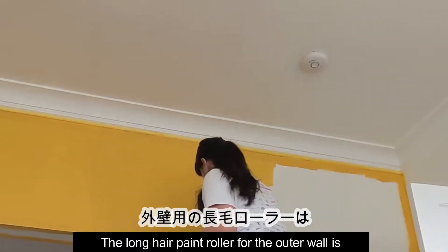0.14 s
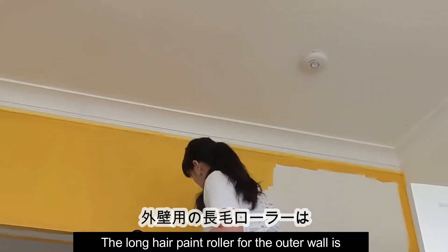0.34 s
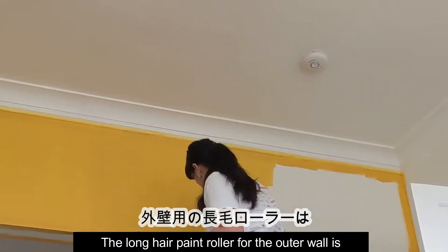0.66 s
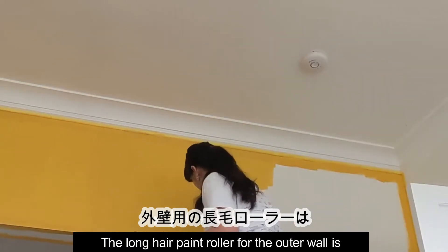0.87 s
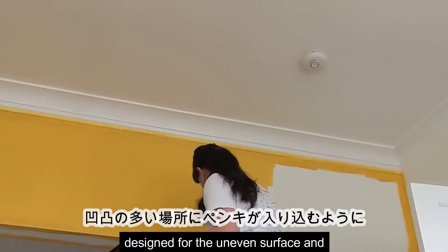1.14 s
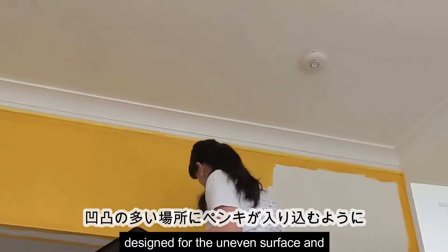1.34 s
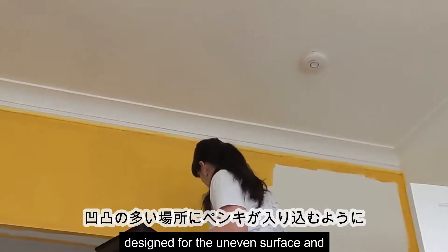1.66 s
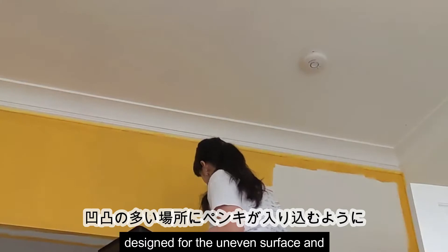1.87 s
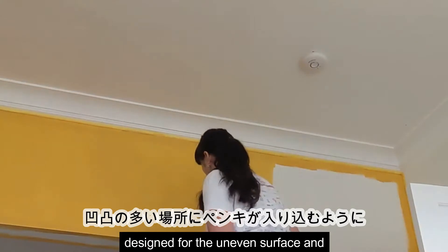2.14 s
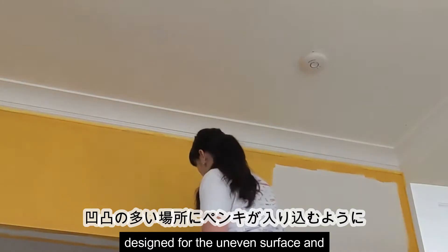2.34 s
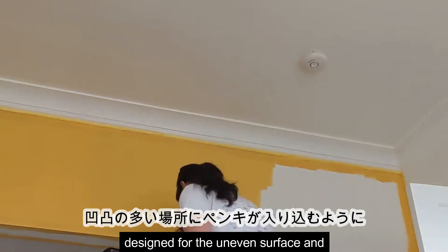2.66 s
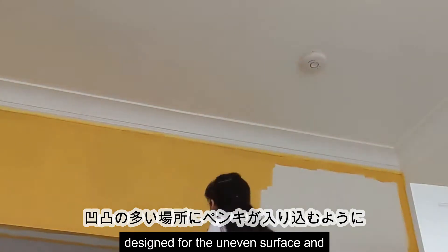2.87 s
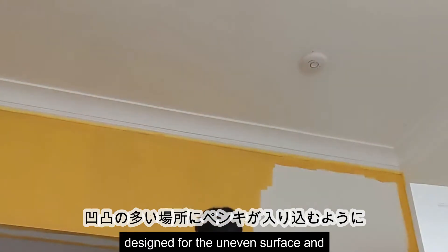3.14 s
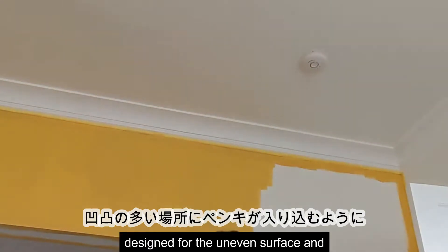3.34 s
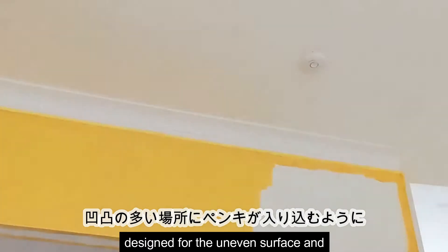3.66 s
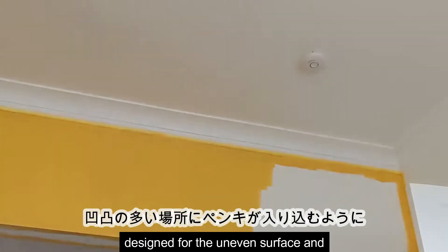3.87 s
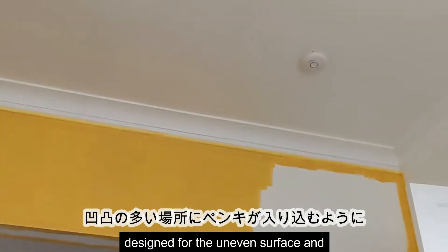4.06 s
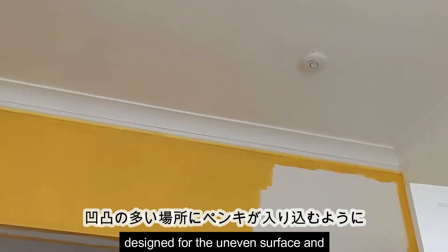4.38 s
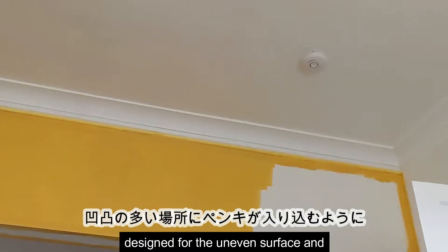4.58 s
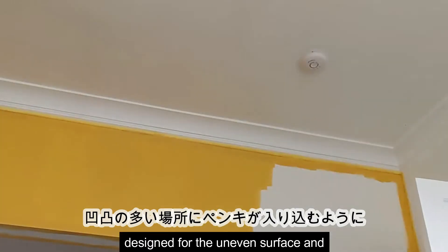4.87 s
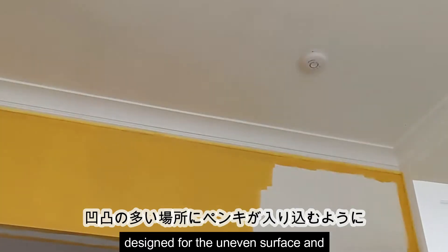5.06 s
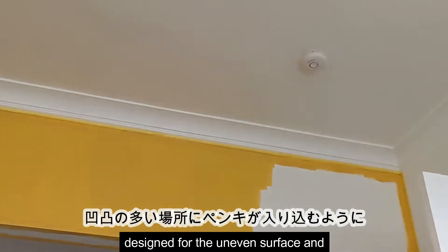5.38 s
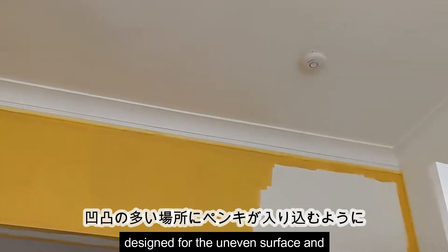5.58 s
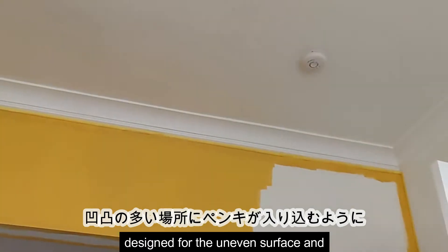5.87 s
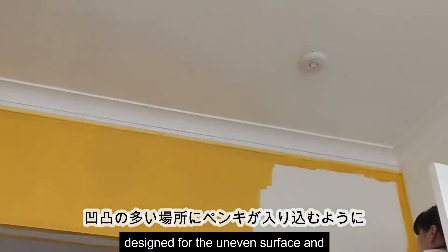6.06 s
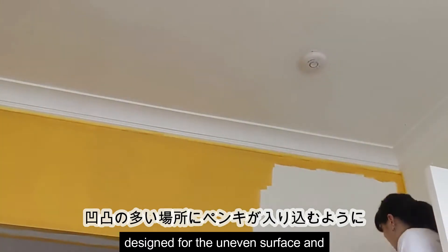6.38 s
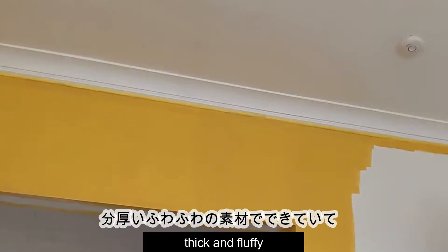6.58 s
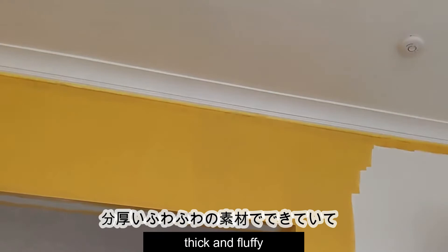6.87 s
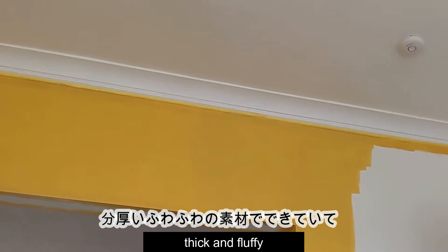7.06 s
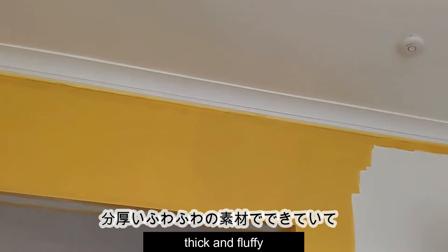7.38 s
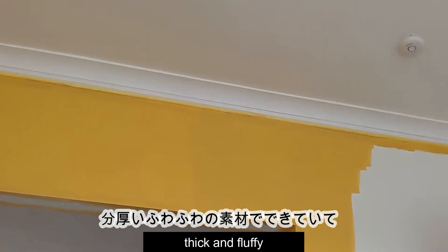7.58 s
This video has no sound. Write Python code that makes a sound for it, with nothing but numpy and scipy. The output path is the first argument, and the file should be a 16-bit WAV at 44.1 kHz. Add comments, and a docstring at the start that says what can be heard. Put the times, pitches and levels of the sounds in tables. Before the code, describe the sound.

Soft sticky hisses of a wet paint roller on an indoor wall, then louder, crowded knocks, peeling crackles and thuds in an empty room.

```python
"""Soft, sticky swells of hiss come first, then louder bursts with knocks and thuds: a long-pile paint roller
works on a wall and its tray in an empty room, heard in fast motion, the work passing in short pieces.
Each burst is tacky paint peeling from the pile, the frame and tray ringing, and a thud through wall and floor.
Between bursts the roller rubs quietly. Rubbing sounds are coloured noise; squeaks and rings are dying sine notes."""
import sys
import numpy as np
from scipy import signal
from scipy.io import wavfile
from scipy.ndimage import uniform_filter1d

SR = 44100
rng = np.random.default_rng(int(sys.argv[2]) if len(sys.argv) > 2 else 0)


def wav_record(signal):
    """Record a signal, one row per channel, as 16-bit PCM in the file named by sys.argv[1]."""
    frames = np.transpose(np.atleast_2d(signal))
    bounded = np.clip(frames, -1, 1)
    # unit amplitude maps onto the largest positive 16-bit level
    quanta = np.round(bounded * 32767).astype(np.int16)
    wavfile.write(sys.argv[1], SR, quanta)


N = 340893  # length in samples


def amp(db):
    """Turns dB into a gain."""
    return 10 ** (np.asarray(db) / 20)


def evened(x):
    """Scales a signal to an rms of 1."""
    return x / np.sqrt(np.mean(x ** 2) + 1e-20)


def read(points, hz):
    """Reads a curve drawn with straight lines on a log-frequency axis."""
    f, value = np.transpose(points)
    return np.interp(np.log(hz + 1), np.log(f + 1), value)


# Ringing of the frame and tray. Each row: pitch in Hz, width in Hz, lift in dB before a layer's ring share.
RING_MODES = [(517, 23, 4.5), (737, 30, -0.5), (1766, 290, 5.5)]
# How alike left and right are. Each row: frequency in Hz, likeness from 0 to 1 before a layer's own share.
LEFT_RIGHT_LIKENESS = [(60, 1), (300, 0.9), (700, 0.54), (3000, 0.089)]
LEFT_DELAY_S = 4.5 / SR  # the left microphone port is farther from the work


def texture(colour, likeness=0., ring=0., grain_db=0., patchy_db=3.5, clump_db=0.):
    """Steady stereo noise: random-sized grains, partly shared by both ports, coloured in drifting patches."""
    grain_sizes = np.minimum(rng.exponential(1, (2, N)), 6)
    grains = rng.standard_normal((2, N)) * amp(grain_db * grain_sizes)
    # fibres let go in bunches
    bunches = evened(uniform_filter1d(rng.standard_normal(N), size=120))
    grains = grains * amp(clump_db * bunches)

    hz, _, (first, second) = signal.stft(grains, SR, nperseg=1024)
    same = np.clip(likeness * read(LEFT_RIGHT_LIKENESS, hz), 0, 1)[:, None]
    delay = np.exp(-2j * np.pi * hz * LEFT_DELAY_S)[:, None]
    left = first * delay
    right = same * first + np.sqrt(1 - same ** 2) * second

    patches = rng.standard_normal(first.shape)
    patches = uniform_filter1d(patches, size=3, axis=0)  # neighbouring pitches
    patches = evened(uniform_filter1d(patches, size=4, axis=1))  # neighbouring moments
    lift_db = sum(db / (1 + (2 * (hz - f) / width) ** 2) for f, width, db in RING_MODES)
    colour_db = (read(colour, hz) + ring * lift_db)[:, None]
    spectrum = np.array([left, right]) * amp(colour_db + patchy_db * patches)

    sound = evened(signal.istft(spectrum, SR, nperseg=1024)[1][:, :N])
    power = uniform_filter1d((sound ** 2).mean(0), size=400)
    return sound / np.sqrt(power + 0.8)  # loud moments are pressed down


def played(sound, rows, level_db, fall_ms, start=0.0039, lean=0.08, bend=1.63, slow=0.86, snap=0.):
    """Cuts one piece a row out of a steady sound: bell-shaped rise, longer fall, a snap at the peak."""
    out = np.zeros((2, N))
    pans_db = 1.5 * rng.standard_normal(len(rows))  # left minus right
    for (s, *_), db, ms, pan in zip(rows, level_db, fall_ms, pans_db):
        fall = slow * ms / 1000  # seconds to drop 30 dB
        rise = start + lean * fall  # longer pieces also start more gently
        first = max(round((s - 4 * rise) * SR), 0)
        last = min(round((s + 2 * fall) * SR), N)
        at = np.arange(first, last)
        u = at / SR - s  # seconds from the peak
        rising = np.exp(-.5 * (u / rise) ** 2)
        falling = amp(-30 * (abs(u) / fall) ** bend)
        shape = np.where(u < 0, rising, falling) + snap * np.exp(-abs(u) / 0.003)
        piece = sound[:, at] * shape
        piece /= np.sqrt(np.mean(piece ** 2) / np.mean(shape ** 2) + 1e-20)
        out[:, at] += amp(db + np.array([[pan / 2], [-pan / 2]])) * piece
    return out


def notes(rows, t60, rise, wobble, swell_s=0.):
    """Sine notes that lose 60 dB in t60 seconds, waver in pitch and rise over some cycles plus swell_s."""
    out = np.zeros(N)
    t = np.arange(SR // 5) / SR
    for s, hz, db in rows:
        waver = wobble * evened(uniform_filter1d(rng.standard_normal(len(t)), size=400))  # radians
        attack = np.minimum(t / (rise / hz + swell_s), 1)
        note = np.sin(2 * np.pi * hz * t + waver) * amp(db - 60 * t / t60) * attack
        out[round(s * SR):][:len(t)] += np.sqrt(2) * note
    return out


# Colour of the quiet room. Each row: frequency in Hz, relative level in dB per Hz.
AIR_COLOUR = [(20, -18), (55, -1), (300, -9), (770, -18.5), (1000, -17.5), (16000, -39)]
AIR_GAIN_DB = -64


def room_air():
    """The quiet of the room: steady, mostly low noise, unrelated in the two ports."""
    return amp(AIR_GAIN_DB) * texture(AIR_COLOUR)


# Quiet rubbing. Each row: time in seconds, gain in dB of the rumble, of the middle tones, of the dull hiss.
RUB_LEVELS = [(2.2, -87, -72.5, -87), (2.86, -66.5, -64.5, -71.5), (3.0, -56, -60, -75),
              (3.18, -47, -55.5, -71), (3.37, -58, -57, -69), (3.55, -64, -62, -65.5),
              (4.0, -51, -75, -70.5), (4.4, -70, -55.5, -65.5), (4.74, -55, -57.5, -64),
              (4.91, -60, -91, -73), (5.4, -47, -48.5, -56), (5.93, -62, -72, -69), (6.33, -43.5, -66, -72),
              (6.65, -68, -69, -63.5), (6.97, -51, -65, -64.5), (7.1, -70, -74, -65), (7.33, -50, -60, -80),
              (7.47, -62, -80, -57), (7.73, -50, -64, -67.5)]
# Colours of the rubbing: wall and floor (also used by the bursts), middle tones, dull hiss.
# Each row: frequency in Hz, relative level in dB per Hz.
THUD_COLOUR = [(24, -23), (55, 8.5), (120, 12), (250, -7.5), (420, -70)]
SCRUB_COLOUR = [(200, -4), (400, 4), (700, 1.5), (1000, -8.5), (2200, -39)]
SCUFF_COLOUR = [(900, -4.5), (1700, 3), (3500, -5), (7000, -9.5), (16000, -27)]


def rubbing():
    """A low rumble, hollow middle tones and a dull hiss swell and sink under the bursts."""
    s, *levels_db = np.transpose(RUB_LEVELS)
    t = np.arange(N) / SR
    rumble, middle, hiss = (amp(np.interp(t, s, db, left=-120)) for db in levels_db)
    low = rumble * texture(THUD_COLOUR, likeness=0.77, patchy_db=7.0)
    mid = middle * texture(SCRUB_COLOUR, likeness=0.35, ring=0.45, patchy_db=5.5, clump_db=3.0)
    high = hiss * texture(SCUFF_COLOUR, likeness=0.25, grain_db=4.0)
    return low + mid + high


# Brushing contacts. Each row: start in seconds, pitch in Hz, level in dB.
BRUSH_CONTACTS = [(.28, 932, -51.5), (.96, 276, -49.5), (1.74, 895, -53), (2.14, 903, -52),
                  (2.55, 402, -51), (3.27, 770, -48), (4.29, 503, -48), (4.44, 593, -50.5),
                  (5.585, 1023, -50)]


def brushes():
    """Soft brushing contacts: slow-rising notes whose strong waver blurs the pitch."""
    return notes(BRUSH_CONTACTS, t60=0.17, rise=6.8, wobble=3.1)


# Squeaks of the roller axle. Each row: start in seconds, pitch in Hz, level in dB.
AXLE_SQUEAKS = [(2.978, 1360, -48), (2.98, 1664, -44), (3.228, 1674, -39.5), (3.251, 2490, -47),
                (3.376, 1680, -45.5), (3.516, 2520, -48), (5.582, 1930, -43)]


def squeaks():
    """The roller axle squeaks: short, high notes with little waver."""
    return notes(AXLE_SQUEAKS, t60=0.09, rise=1.3, wobble=0.3)


TICK_S, TICK_DB = .364, -38  # start and level of the tap
# Ringing of the thin frame. Each row: pitch in Hz, level in dB relative to the tap.
FRAME_MODES = [(786, -3), (1733, -3), (2676, -5.5), (3408, -8), (4080, -10)]


def frame_tick():
    """A light tap on the thin frame sets several high notes ringing together."""
    rows = [(TICK_S, hz, TICK_DB + db) for hz, db in FRAME_MODES]
    return notes(rows, t60=0.1, rise=.3, wobble=1.54, swell_s=0.016)


# Knocks on wood. Each row: start in seconds, pitch as a share of the usual, level in dB.
WOOD_HITS = [(3.674, 0.98, -33.5), (5.065, 0.93, -37), (6.318, 1.03, -40), (6.33, .99, -37.5),
             (6.905, 1.06, -44)]
# Ringing of the hollow wood. Each row: usual pitch in Hz, level in dB relative to the knock.
HOLLOW_WOOD_MODES = [(215, -2.5), (436, -1), (640, -8.5)]


def wood_knocks():
    """Knocks on a hollow wooden thing: each rings with the same few notes, all shifted together."""
    rows = [(s, hz * share, db + mode_db) for hz, mode_db in HOLLOW_WOOD_MODES for s, share, db in WOOD_HITS]
    return notes(rows, t60=0.081, rise=1.0, wobble=0.58)


# Single sharp blows. Each row: start in seconds, ring in Hz, level in dB.
SHARP_BLOWS = [(4.735, 164, -22), (4.836, 193, -20), (1.709, 1036, -39.5), (4.955, 193, -17.5)]


def blows():
    """Single sharp blows ring with one note that dies very fast."""
    return notes(SHARP_BLOWS, t60=0.028, rise=0.32, wobble=0.54)


# Dry snaps of about one cycle. Each row: middle in seconds, pitch in Hz, peak level in dB.
DRY_SNAPS = [(3.223, 400, -38.5), (3.251, 400, -40), (3.927, 710, -28.5), (3.991, 257, -31.5),
             (4.853, 298, -20), (5.033, 900, -42), (5.082, 1080, -28), (7.047, 895, -28),
             (7.484, 724, -34.5), (5.86, 2040, -24.5), (5.976, 500, -37), (6.264, 160, -36.5),
             (6.47, 450, -35), (6.292, 795, -32), (6.452, 487, -31), (6.701, 905, -33.5),
             (6.917, 500, -27.5), (7.438, 880, -31)]
SNAP_CYCLES = 0.44  # half-width of the bell, in cycles


def snaps():
    """Each snap is a bell-shaped dip of pressure with a weaker swing on either side."""
    out = np.zeros(N)
    for s, hz, db in DRY_SNAPS:
        u = np.arange(-600, 600) / SR * hz  # cycles from the middle
        dip = np.cos(2 * np.pi * u) * np.exp(-(u / SNAP_CYCLES) ** 2)
        out[round(s * SR) - 600:][:len(u)] -= amp(db) * dip
    return out


# Soft passes along the wall. Each row: peak in seconds, level in dB.
WALL_STROKES = [(0.01, -48), (0.074, -55), (0.165, -51), (0.256, -52), (0.405, -56.5), (0.462, -57.5),
                (0.518, -57.5), (0.57, -57.5), (0.616, -59), (0.685, -53), (0.802, -56.5), (0.922, -54.5),
                (1.012, -51), (1.099, -54.5), (1.139, -51.5), (1.214, -54), (1.28, -54), (1.356, -50.5),
                (1.453, -51.5), (1.519, -51.5), (1.59, -55), (1.647, -54.5), (1.741, -50.5), (1.803, -52),
                (1.874, -54.5), (1.95, -56.5), (2.013, -55), (2.131, -51.5)]
# Wet pile rolling softly. Each row: frequency in Hz, relative level in dB per Hz.
SWISH_COLOUR = [(150, -7), (400, -1.5), (2500, 0.5), (7000, 0), (16000, -8)]
STROKE_LONGEST_MS, STROKE_LAST_S = 163, 0.072  # cap on the fall; wait counted after the last pass


def strokes():
    """Wet pile rolls softly in smooth swells of hiss, each with a fall set by the wait for the next."""
    s, level_db = np.transpose(WALL_STROKES)
    wait_ms = 1000 * np.diff(s, append=s[-1] + STROKE_LAST_S)
    fall_ms = np.minimum(wait_ms, STROKE_LONGEST_MS)
    hiss = texture(SWISH_COLOUR, patchy_db=0.9)
    return played(hiss, WALL_STROKES, level_db, fall_ms, start=0.0084, lean=0.14, bend=2.14)


def split(level_db, lead_db):
    """Shares the power of a layer between two colours; the first wins as its lead grows."""
    share = 1 / (1 + np.exp(-lead_db / 5.54))
    return level_db + 10 * np.log10(np.array([share, 1 - share]) + 1e-9)


# Harder work. Each row: peak in seconds, level in dB of the treble (peeling and clack), level in dB of the thud.
HARD_BURSTS = [(0.381, -52.5, -56), (1.716, -51, -48), (2.446, -53, -46.5), (2.513, -48, -53.5),
               (2.592, -58.5, -61), (2.731, -52, -51), (2.913, -37.5, -71), (2.957, -52.5, -67),
               (2.983, -41, -66), (3.037, -76, -47), (3.087, -59.5, -58.5), (3.146, -82, -49),
               (3.172, -55.5, -68), (3.195, -48, -68), (3.227, -41.5, -79), (3.255, -40, -56),
               (3.348, -79, -46.5), (3.389, -46, -68), (3.453, -55, -79), (3.496, -51, -85),
               (3.521, -42.5, -66.5), (3.553, -49, -55), (3.59, -61, -48), (3.684, -62.5, -37),
               (3.777, -56, -44.5), (3.817, -67, -49), (3.872, -45, -46.5), (3.904, -46, -70),
               (3.932, -43, -39), (3.984, -48.5, -43.5), (4.059, -66.5, -52), (4.127, -55.5, -45.5),
               (4.215, -47, -46), (4.256, -40, -43.5), (4.356, -64.5, -83), (4.447, -70, -48.5),
               (4.61, -61, -53), (4.739, -35, -33.5), (4.856, -26, -28), (4.958, -45, -32.5),
               (5.033, -55, -43.5), (5.078, -46.5, -40.5), (5.132, -58, -52), (5.16, -57.5, -42),
               (5.196, -56, -45.5), (5.231, -51.5, -40), (5.287, -51, -48.5), (5.329, -43, -38),
               (5.385, -43, -45), (5.415, -57, -55), (5.485, -49, -41), (5.518, -44, -49.5),
               (5.583, -40, -50), (5.618, -43, -57), (5.676, -52.5, -46.5), (5.777, -53.5, -42),
               (5.814, -46.5, -44), (5.857, -41, -63), (5.949, -55.5, -63), (5.977, -45, -40.5),
               (6.011, -43, -56), (6.055, -48.5, -46.5), (6.153, -41, -68), (6.18, -43, -66),
               (6.212, -40.5, -72), (6.257, -47.5, -42.5), (6.294, -51.5, -62), (6.326, -52, -38),
               (6.371, -43.5, -42), (6.401, -45, -57), (6.45, -46, -44.5), (6.481, -55, -44.5),
               (6.528, -43.5, -49), (6.579, -53.5, -60), (6.606, -57, -63), (6.627, -54, -60),
               (6.704, -46.5, -38.5), (6.739, -54.5, -41), (6.817, -46.5, -52.5), (6.867, -61.5, -42),
               (6.918, -43, -34.5), (6.992, -62.5, -53), (7.045, -46.5, -41), (7.083, -58, -61),
               (7.117, -53.5, -43), (7.198, -74, -55), (7.264, -76, -42), (7.288, -51, -43),
               (7.336, -61, -49), (7.363, -52, -44.5), (7.422, -59, -54), (7.438, -48, -47.5),
               (7.483, -49.5, -41), (7.529, -56.5, -43), (7.566, -54, -45.5), (7.614, -45, -46),
               (7.708, -51.5, -41.5)]
# Colours of a burst: paint torn off faster, top of a hard knock, hollow tray and wall, hard edge of the frame.
# Each row: frequency in Hz, relative level in dB per Hz.
PEEL_COLOUR = [(800, -38), (1500, -2), (3000, 0), (8000, -2.5), (16000, -14)]
CLACK_COLOUR = [(900, -10), (1700, -1), (3500, -5), (7000, -14), (16000, -78)]
KNOCK_COLOUR = [(200, -2.5), (300, 6.5), (650, -2.5), (1000, -13.5), (1600, -43)]
RAP_COLOUR = [(400, -19), (700, 5.5), (1500, 1), (2400, -39)]
# The base fall grows when more paint peels and the next burst is far off; each layer then shortens it.
FALL_MS, USUAL_DB, FALL_MS_PER_DB, FALL_PER_WAIT, LONG_WAIT_MS = 48.7, -40.5, 1.12, 0.34, 81
KNOCK_SHARE, KNOCK_DB = 0.51, -1.5  # share of the way from peeling to thud level, then an offset
DULLEST_DB = 17.5  # even the hardest knock keeps some bright peeling


def bursts():
    """Paint peels, frame and tray ring, wall thuds; strong knocks dull the treble, heavy thuds sound hollow."""
    s, peel_db, thud_db = np.transpose(HARD_BURSTS)
    wait_ms = np.minimum(1000 * np.diff(s, append=N / SR), LONG_WAIT_MS)
    ms = FALL_MS + FALL_MS_PER_DB * (peel_db - USUAL_DB) + FALL_PER_WAIT * wait_ms
    ms = np.maximum(ms, 15.5)

    knock_db = peel_db + KNOCK_SHARE * (thud_db - peel_db) + KNOCK_DB
    dullness_db = 0.5 * (knock_db - peel_db) + 2.4 * np.maximum(knock_db + 42.5, 0)
    clack_db, fizz_db = split(peel_db, np.minimum(dullness_db, DULLEST_DB))
    hollow_db, rap_db = split(knock_db, 0.054 * (thud_db - peel_db) + 3.5)

    fizz = texture(PEEL_COLOUR, likeness=0.14, grain_db=2.0, patchy_db=1.84, clump_db=2.0)
    fizz = played(fizz, HARD_BURSTS, fizz_db, ms, lean=0.12, slow=0.66, snap=0.99)
    clack = texture(CLACK_COLOUR, likeness=0.54, ring=0.78, grain_db=2.5, clump_db=2.0)
    clack = played(clack, HARD_BURSTS, clack_db, ms)
    hollow = texture(KNOCK_COLOUR, likeness=0.98, ring=0.84, patchy_db=4.5)
    hollow = played(hollow, HARD_BURSTS, hollow_db, ms, slow=0.88, snap=0.94)
    rap = texture(RAP_COLOUR, likeness=0.69, ring=0.35, patchy_db=3.0)
    rap = played(rap, HARD_BURSTS, rap_db, ms, slow=0.82, snap=1.0)
    thud = played(texture(THUD_COLOUR, likeness=0.86), HARD_BURSTS, thud_db, ms, slow=0.62)
    return fizz + clack + hollow + rap + thud


# Moments when the work dips. Each row: middle in seconds, length in seconds, change in dB before edge softening.
WORK_HUSHES = [(0.333, 0.058, -13), (6.559, 0.014, -17)]


def hushed(work):
    """Lowers the sound briefly during each hush, with soft edges."""
    t = np.arange(N) / SR
    dip_db = sum(db * (abs(t - s) < length / 2) for s, length, db in WORK_HUSHES)
    return work * amp(uniform_filter1d(dip_db, size=200))


def scene():
    """The work over the quiet of the room; only strokes, bursts and rubbing dip in the hushes."""
    work = hushed(rubbing() + strokes() + bursts())
    hits = frame_tick() + wood_knocks() + blows() + snaps()
    return room_air() + brushes() + squeaks() + hits + work


def record(dry):
    """The microphone drops the deepest bass; then a steep filter removes the very top."""
    low_cut = signal.butter(2, 38, "high", fs=SR, output="sos")
    dry = signal.sosfilt(low_cut, dry)
    top_cut = signal.firwin(511, 15850, window=("kaiser", 9), fs=SR)  # edge in Hz
    return signal.oaconvolve(dry, top_cut[None], "same")


dry = scene()
out = record(dry)
wav_record(out)
```